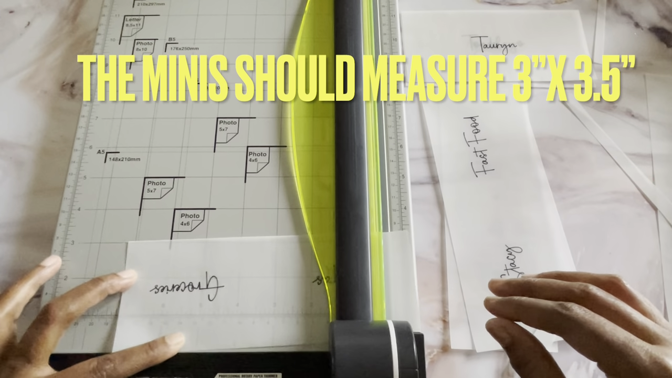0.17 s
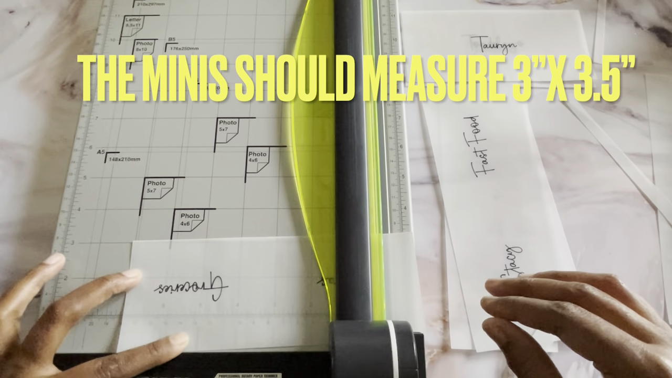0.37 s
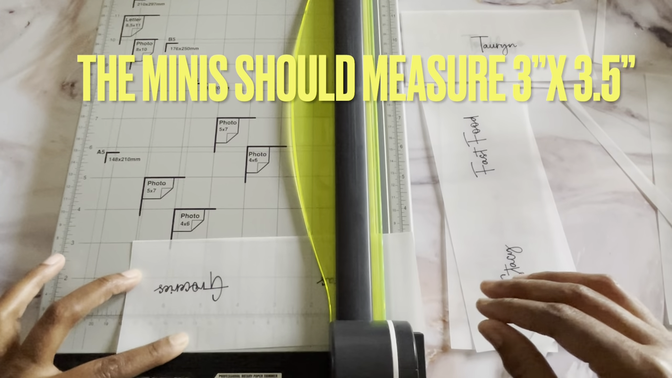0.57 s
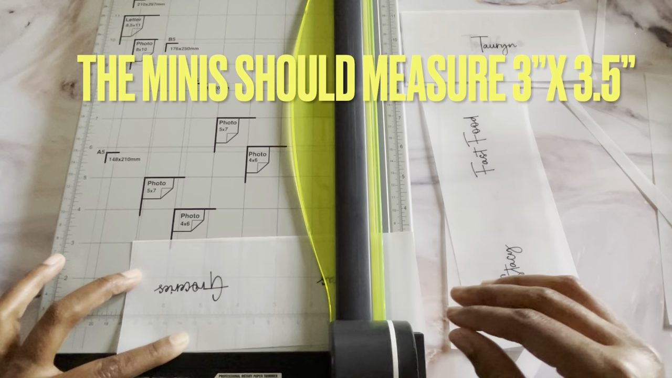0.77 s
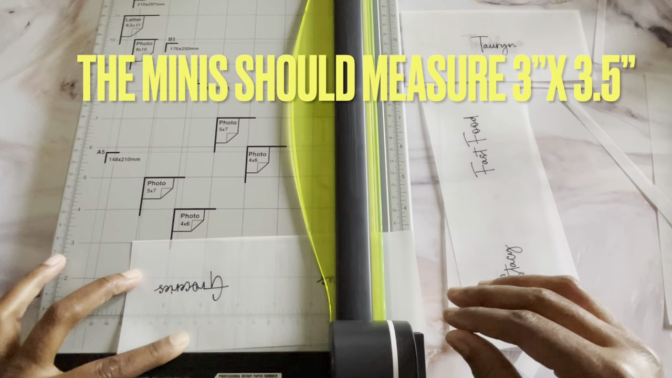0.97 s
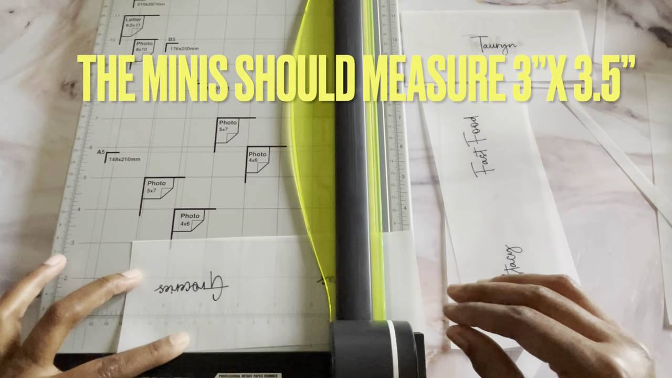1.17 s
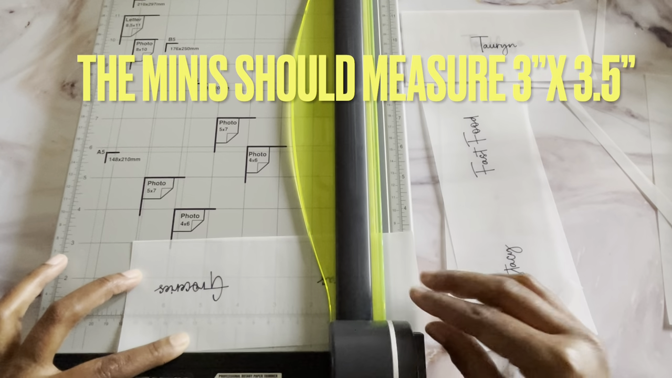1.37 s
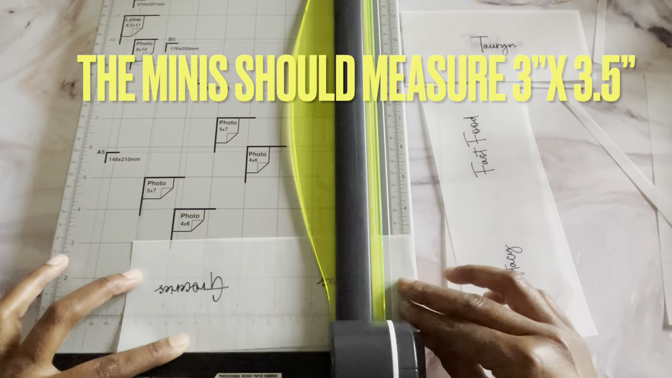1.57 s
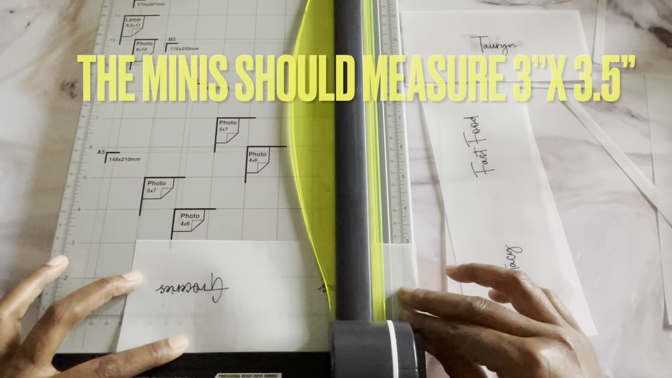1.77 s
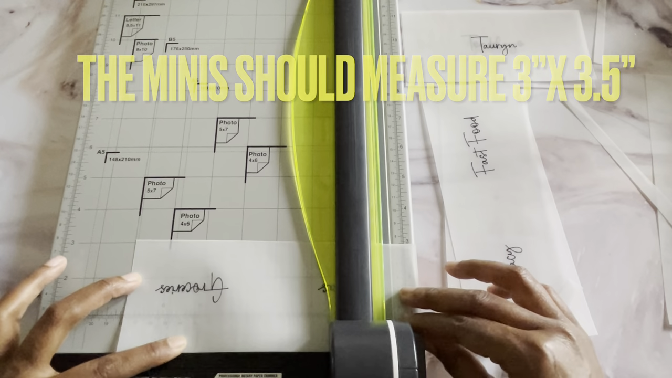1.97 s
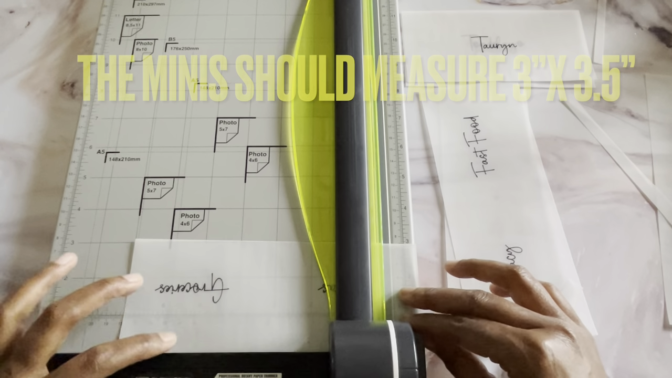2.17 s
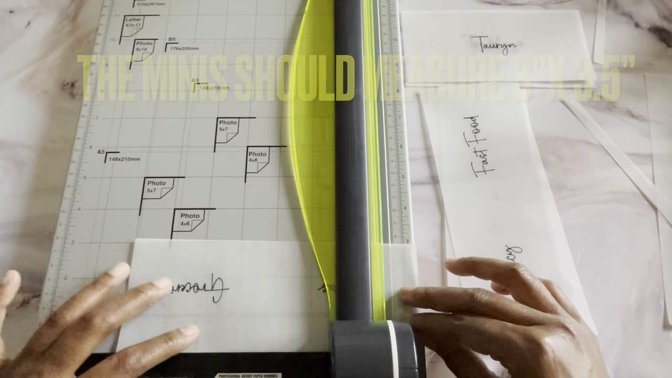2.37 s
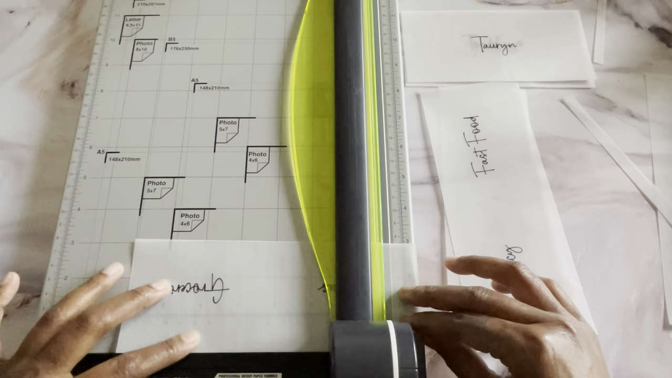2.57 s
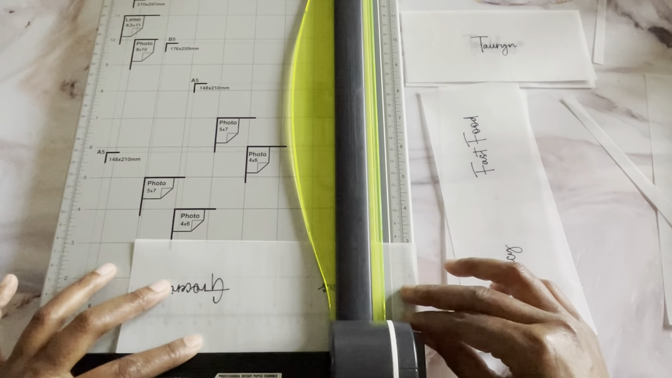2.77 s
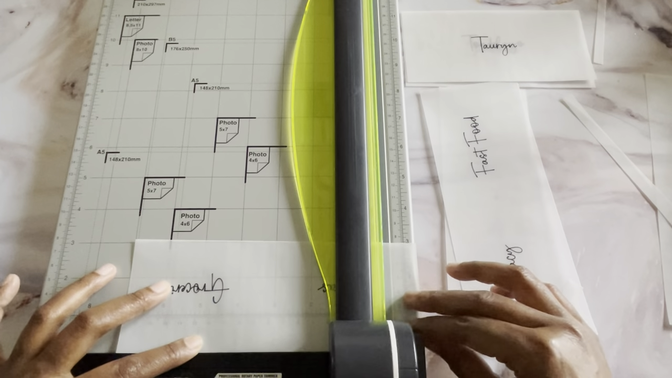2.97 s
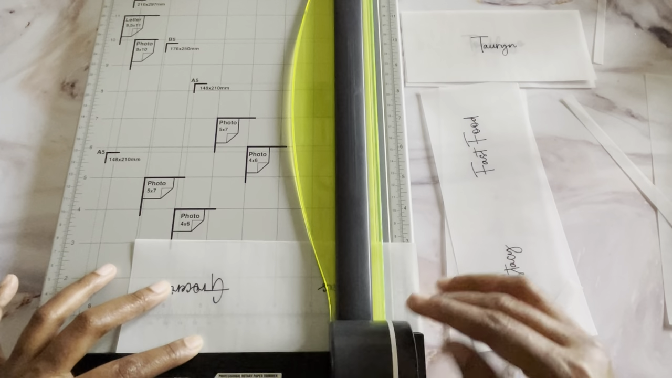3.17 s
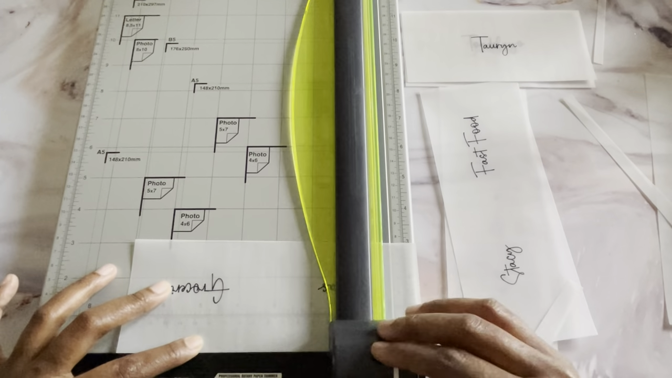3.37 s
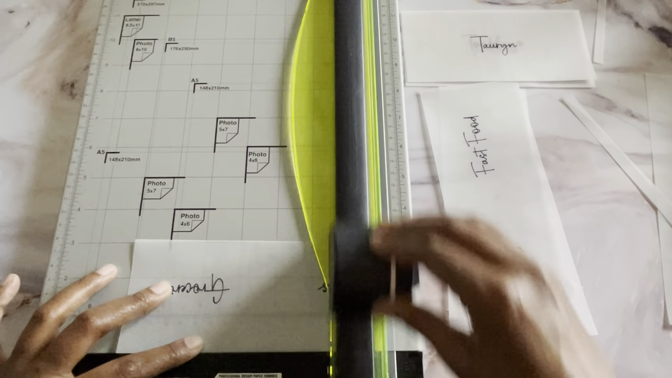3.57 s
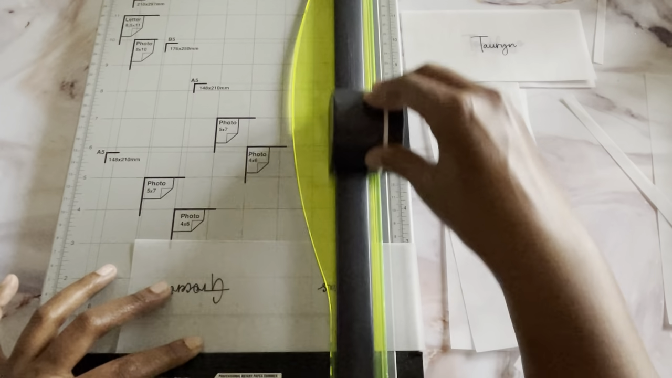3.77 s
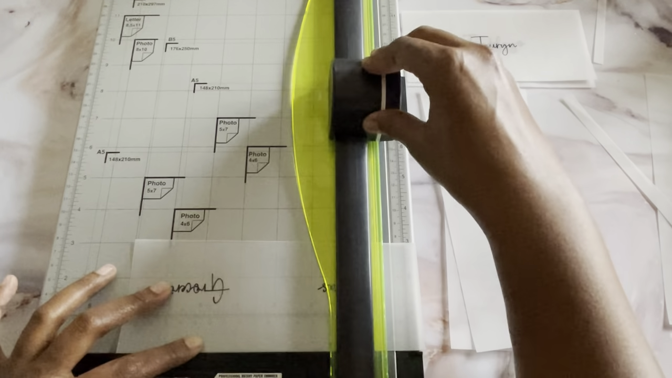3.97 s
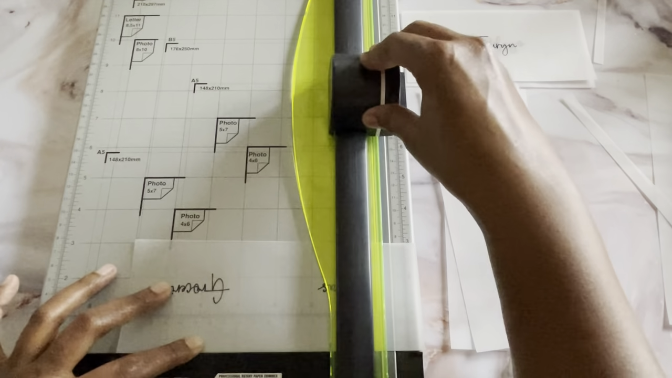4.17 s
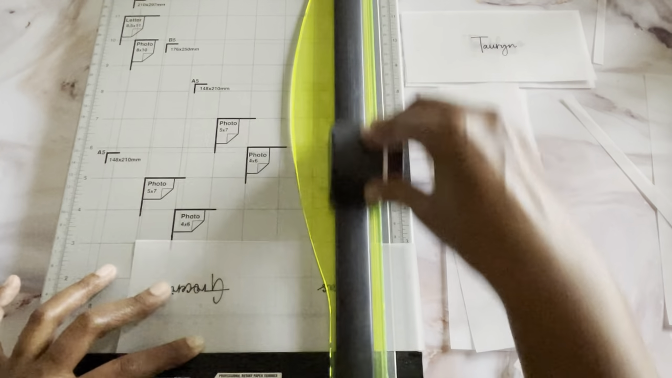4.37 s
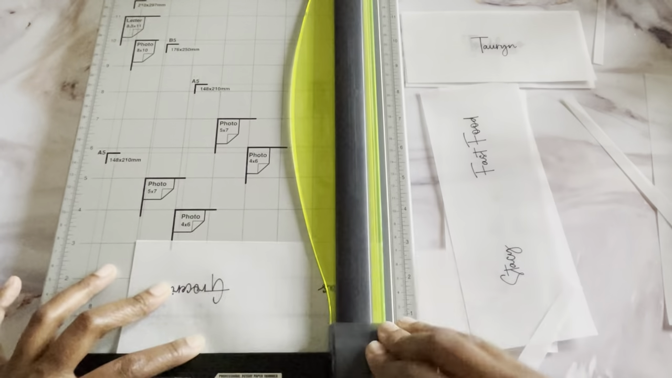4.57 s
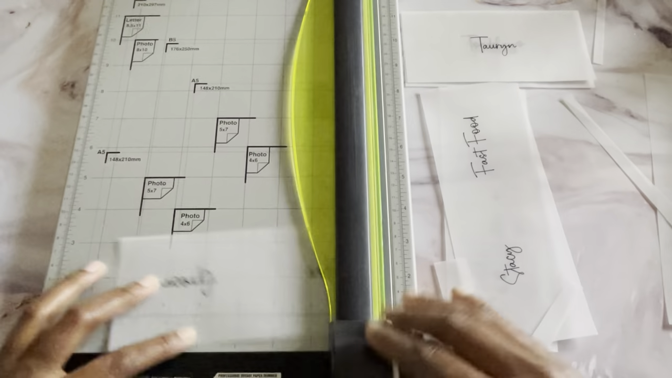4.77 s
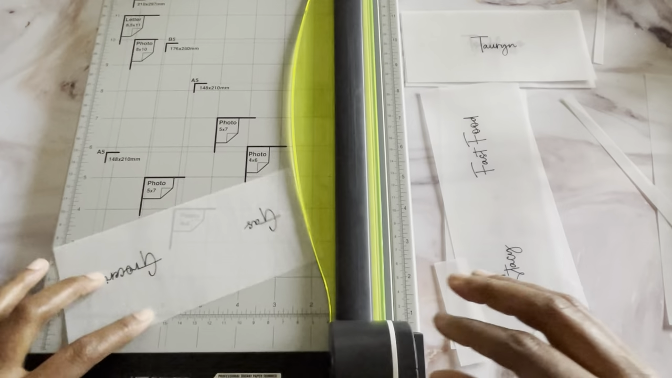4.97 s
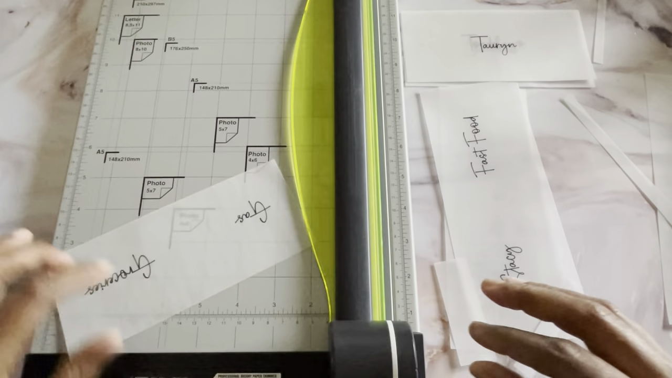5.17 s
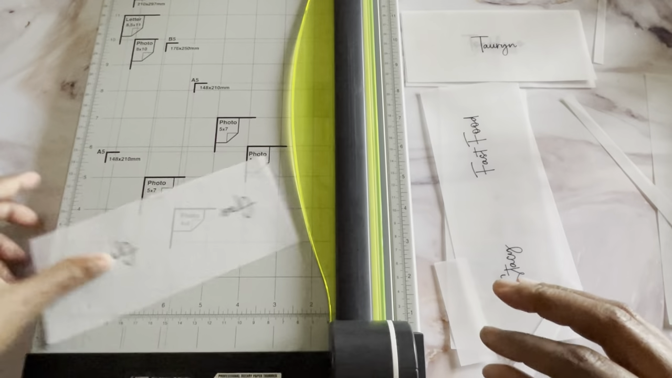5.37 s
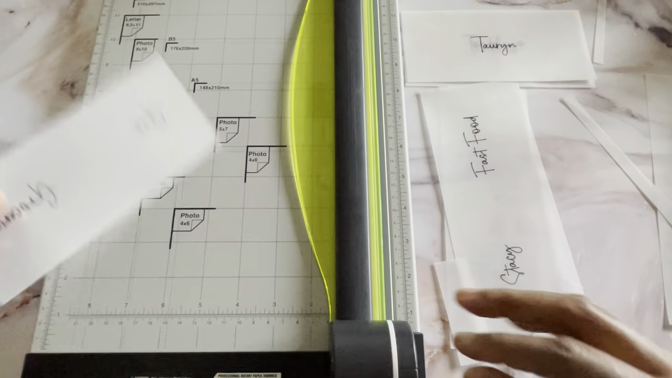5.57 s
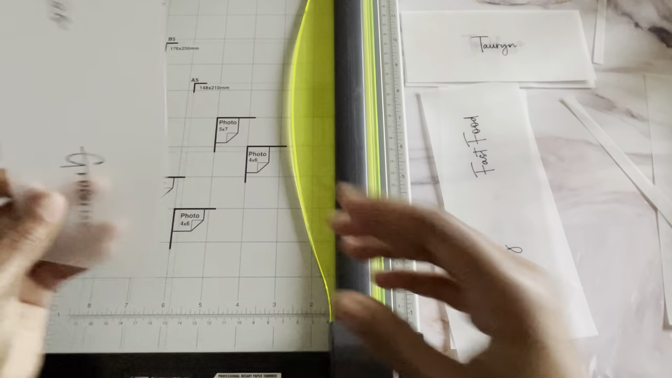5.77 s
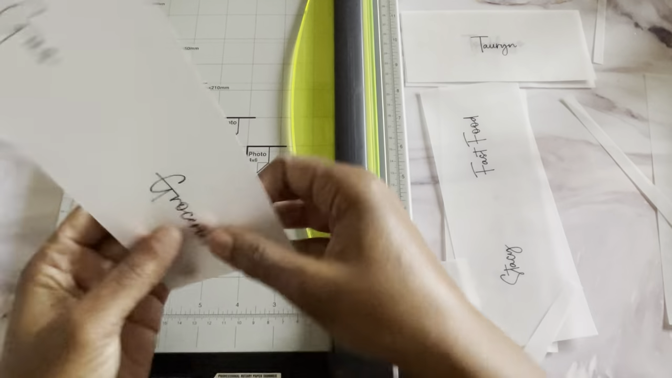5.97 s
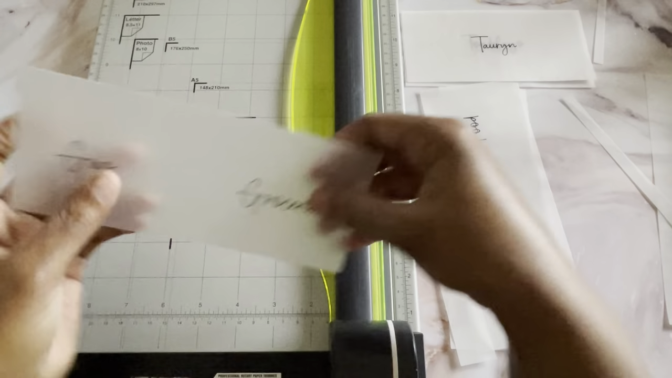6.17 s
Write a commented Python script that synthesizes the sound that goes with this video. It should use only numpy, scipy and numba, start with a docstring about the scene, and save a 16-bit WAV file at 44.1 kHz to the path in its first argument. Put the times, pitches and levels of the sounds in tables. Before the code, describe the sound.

Nearly silent at first: soft rumble, a few tiny finger rubs and creaks. A plastic carriage clacks and rasps along a rail, stops with a sharp knock, then returns faster with a hissing cut and a heavier hollow thunk, followed by a cluster of knocks as it settles. Paper is then lifted, swishing and crackling ever louder. Close microphones, small dry furnished room.

```python
"""A sliding paper trimmer on a desk in a quiet room: fingers shift the sheet, the blade carriage is pushed up its
rail and pulled back through the paper, knocks at the stops, and the sheet is lifted away.
Friction noise and bursts for knocks and scrapes ring the plastic carriage, hollow base and desk; a thin rail rings on.
Paper is banded hiss with grainy snaps, creaking plastic is narrow-band noise, and a machine hums far off.
Two close microphone ports hear it all, with a short diffuse room tail."""
import sys
import numpy as np
from scipy import signal
from scipy.fft import rfft, irfft
from scipy.io import wavfile
from scipy.ndimage import uniform_filter1d
from numba import njit

SR = 44100
rng = np.random.default_rng(int(sys.argv[2]) if len(sys.argv) > 2 else 0)


def magnitude_from_level(level_db):
    """Linear magnitude for a level in decibels (20 dB per decade)."""
    exponent = np.asarray(level_db, float) / 20
    return 10 ** exponent


def transcribe(signal):
    """Save signal, clipped to [-1, 1], as a 16-bit WAV file at the path in sys.argv[1]."""
    frames = np.atleast_2d(signal).T
    limited = np.clip(frames, -1, 1)
    pcm = np.round(limited * 32767).astype(np.int16)
    wavfile.write(sys.argv[1], SR, pcm)


N = 274478
T = np.arange(N) / SR  # s


def shape(x, table):
    """Colour by a (f/Hz, level/dB) spectrum, interpolated over log frequency."""
    hz, db = np.transpose(table)
    f = np.maximum(np.fft.rfftfreq(N, 1 / SR), 1)
    gain_db = np.interp(np.log(f), np.log(hz), db)
    return irfft(rfft(x) * magnitude_from_level(gain_db), N)


def unit(x):
    """Scale to rms 1."""
    return x / np.sqrt(np.mean(x ** 2))


def level(x, envelope):
    """Give a burst the energy of its envelope."""
    return x * np.sqrt(np.sum(envelope ** 2) / np.sum(x ** 2))


def ring(x, modes):
    """Sum of decaying modes (f/Hz, level/dB, t60/s), levelled for steady noise."""
    out = 0
    for hz, db, t60 in modes:
        r = np.exp(-np.log(1000) / (t60 * SR))
        w = 2 * np.pi * hz / SR
        mode = signal.lfilter([np.sin(w) * np.sqrt(1 - r)], [1, -2 * r * np.cos(w), r * r], x)
        out = out + magnitude_from_level(db) * mode
    return out


@njit
def sweep(x, hz, k):
    """State-variable band-pass whose centre moves; a larger k is a wider band."""
    y, b, l = np.empty(len(x)), 0., 0.
    for i in range(len(x)):
        g = np.tan(np.pi * hz[i] / SR)
        v = (b + g * (x[i] - l)) / (1 + g * (g + k))
        b, l, y[i] = 2 * v - b, l + 2 * g * v, k * v
    return y


def band(x, hz, k):
    """Steep fixed band, two filters in a row, rms 1."""
    hz = np.full(len(x), 1. * hz)
    return unit(sweep(sweep(x, hz, k), hz, k))


def walk(rate):
    """Random levels held 1 / rate s and slewed twice; spread near 1."""
    k = int(SR / rate)
    steps = np.repeat(rng.standard_normal(N // k + 1), k)
    return 1.26 * uniform_filter1d(uniform_filter1d(steps, k), k)[:N]


def grit(spread_db, patchy_db, rate):
    """Dense contacts of uneven size whose strength comes in patches."""
    size = np.minimum(rng.exponential(size=N), 5)
    return unit(rng.standard_normal(N) * magnitude_from_level(spread_db * size + patchy_db * walk(rate)))


def play(tables):
    """Soft gate that is shut between the tables, then their curves at every sample."""
    s, *columns = np.concatenate(tables).T
    on = sum((T >= t[0][0]) & (T <= t[-1][0]) for t in tables) > 0
    return (uniform_filter1d(1. * on, size=300), *(np.interp(T, s, c) for c in columns))


def burst(s, ms, rise_ms):
    """Start sample and envelope of a short scrape: a rise to the peak, then an exponential fall."""
    length = min(int((8 * ms + rise_ms) * SR / 1000), N - int(s * SR))
    t = 1000 * np.arange(length) / SR  # ms
    return int(s * SR), np.minimum(t / rise_ms, 1) * np.exp(-np.maximum(t - rise_ms, 0) / ms)


def room_tone():
    """Distant rumble, alike left and right in the bass, with wavering motor lines."""
    # spectrum of the rumble before it is scaled to rumble_db: f/Hz, relative density/dB
    rumble_colour = [(25, -28), (55, 3.5), (80, -2), (200, -11.5), (380, -19), (700, -32.5), (1060, -42),
                     (2000, -49.5), (4500, -53.5), (8000, -64.5), (13000, -61.5), (15000, -82)]
    # width of the rumble: f/Hz, side minus mid/dB
    side_colour = [(60, -27), (200, -11), (380, -2.5), (700, 5), (4000, 1.5)]
    # motor lines, about which pitch and level waver: f/Hz, level/dB
    hum = [(59.2, -57), (96.9, -63), (118.4, -60), (145.3, -64), (193.8, -60.5), (242.2, -72), (296.1, -71),
           (382.2, -79.5)]
    rumble_db = -55.5
    mid = magnitude_from_level(rumble_db) * unit(shape(rng.standard_normal(N), rumble_colour))
    side = magnitude_from_level(rumble_db) * unit(shape(rng.standard_normal(N), rumble_colour))
    side = shape(side, side_colour)
    for hz, db in hum:
        waver_db = 4 * walk(5)
        phase = 2 * np.pi * np.cumsum(hz + 2.2 * walk(9)) / SR
        mid += magnitude_from_level(db + waver_db) * np.sin(phase)
    return np.array([mid + side, mid - side])


def paper():
    """Sliding fibres hiss in a band over the sheet's dull rustle; buckling snaps are grainy bursts."""
    # short rubs of finger and sheet: t/s, length/s, level/dB, main band f/Hz, fine hiss re level/dB
    rubs = [(0.0, 0.014, -76.5, 4220, 4), (0.102, 0.059, -88, 5400, 6.5), (0.213, 0.077, -88.5, 5500, 3.5),
            (1.533, 0.014, -83.5, 4000, 17), (1.581, 0.15, -89.5, 5200, 21), (1.72, 0.042, -64, 4070, -8),
            (1.805, 0.079, -74, 3830, -12), (1.953, 0.032, -70, 4060, -13), (2.373, 0.032, -87, 5550, -2),
            (2.531, 0.07, -94.5, 5030, 21), (2.832, 0.19, -78, 5500, -10.5), (4.742, 0.14, -75, 5550, 22),
            (4.996, 0.049, -94.5, 5490, 20)]
    # the sheet drawn off the base and passed between the hands: t/s, rub level/dB, fine hiss level/dB
    lift = [
        [(5.308, -70, -56.5), (5.4, -60.5, -47.5), (5.44, -64, -51), (5.46, -50, -49.5), (5.51, -49.5, -51.5),
         (5.58, -56, -54), (5.64, -62, -62), (5.69, -61, -54), (5.74, -64.5, -74), (5.86, -58, -53.5),
         (5.905, -66, -69), (5.93, -51, -50.5), (6.11, -69.5, -67.5), (6.22, -53, -43)],
    ]
    # snaps of the buckling sheet: t/s, level/dB, centre f/Hz, fall/ms, rise/ms
    snaps = [(1.421, -69, 3500, 4.4, 1.7), (1.527, -57.5, 7000, 1.2, 0.92), (1.551, -62, 5000, 1.7, 1),
             (1.586, -64, 9000, 4.4, 1.5), (1.712, -53.5, 8600, 1.9, 1.9), (2.351, -56.5, 5800, 3.2, 3.1),
             (2.379, -70, 8000, 2, 0.92), (2.846, -73, 2470, 19, 2.6), (5.352, -51.5, 970, 4.7, 4.2),
             (5.455, -52.5, 1286, 24, 5.1), (5.57, -46.5, 1460, 5.1, 5.6), (5.576, -40.5, 1250, 7.8, 7.3),
             (5.742, -45.5, 1390, 5.4, 1.2), (5.861, -46.5, 4600, 9.2, 2.7), (5.916, -31, 2000, 4, 9.6),
             (5.931, -41, 1100, 9.6, 5.7), (5.989, -35.5, 2200, 5.9, 3.3), (6, -37.5, 2170, 3.3, 7),
             (6.005, -36, 1410, 2.4, 4.6), (6.015, -40, 1760, 5, 2.3), (6.029, -45, 1860, 3.8, 4.5),
             (6.075, -45.5, 6850, 3.6, 4.6), (6.092, -51, 895, 6, 2.1), (6.110, -52.5, 900, 6, 3.8),
             (6.121, -45, 970, 4.1, 4.2), (6.147, -36.5, 1110, 4.1, 5.1), (6.155, -29, 1180, 3.7, 3.7),
             (6.170, -56, 830, 13, 3.1)]
    # colour of the fine hiss: f/Hz, level/dB
    hiss_colour = [(4000, -11.5), (6500, -3.5), (8500, 4.5), (11000, -5.5), (15500, -4.5), (16500, -38.5)]
    rustle_colour = [(150, 21.0), (400, 13.0), (1000, 1.0), (2500, -1.0), (4000, -30.0)]
    attack_s, release_s = 0.013, 0.022  # of a rub
    flex_db, flex_db_per_s = -64, 15  # the free sheet flexes more and more
    creases_per_s, crease_db = 70, -60  # small random creases while the sheet is in the hands
    settle_db, settle_ms = -18.5, 9.3  # crackle that trails a snap

    on, rub_db, hiss_db = play(lift)
    since = np.clip(T - lift[0][0][0], 0, 1)
    hz = 5400 - 1150 * since  # the rub gets duller as the sheet comes free
    fibres = grit(2.8, 3.2, 45)
    sheet = unit(shape(fibres, rustle_colour))
    fine = unit(shape(grit(2.1, 1.5, 40), hiss_colour))
    sliding = unit(sweep(sweep(fibres, hz, 0.7), hz, 0.7))
    out = on * magnitude_from_level(rub_db) * (sliding + magnitude_from_level(-9.0) * sheet)
    out += on * (magnitude_from_level(flex_db + flex_db_per_s * since) * sheet + magnitude_from_level(hiss_db) * fine)

    for s, length, db, band_hz, hiss_rel_db in rubs:
        i = int(s * SR)
        t = np.arange(int((length + 8 * release_s) * SR)) / SR
        e = np.minimum(t / attack_s, 1) * np.exp(-np.maximum(t - length, 0) / release_s)
        cut = slice(i, i + len(e))
        rub = band(fibres[cut], band_hz, 0.39) + magnitude_from_level(-3.5) * sheet[cut] + magnitude_from_level(hiss_rel_db) * fine[cut]
        out[cut] += magnitude_from_level(db) * e * rub

    crackle = grit(1.7, 4.5, 200)
    ticks = (rng.random(N) < creases_per_s / SR) * magnitude_from_level(crease_db + 2.8 * rng.standard_normal(N))
    creases = signal.fftconvolve(ticks, burst(0, 4.4, 2.2)[1])[:N]
    out += on * creases * band(crackle, 1600, 2.2)

    for s, db, centre_hz, ms, rise_ms in snaps:
        i, e = burst(s, ms, rise_ms)
        x = crackle[i:i + len(e)]
        # the whole sheet flaps a little below the snap
        flap_hz = 0.69 * centre_hz
        flap = band(band(x, flap_hz, 3.1), flap_hz, 3.1)
        snap = e * (band(x, centre_hz, 1.8) + magnitude_from_level(2.5) * flap + magnitude_from_level(-31) * x * e)
        out[i:i + len(e)] += magnitude_from_level(db) * level(snap, e)
        # smaller creases settle after it
        i, e = burst(s, settle_ms, 3 * ms)
        settling = e * band(crackle[i:i + len(e)], 0.8 * centre_hz, 1.7)
        out[i:i + len(e)] += magnitude_from_level(db + settle_db) * level(settling, e)
    return out


def creaks():
    """Short stick-slip rubs that sound one narrow plastic resonance and its overtones."""
    # plastic under a finger: t/s, level/dB, pitch f/Hz, overtone re level/dB, fall/ms
    slips = [(0.036, -62, 2095, 2.5, 2.1), (1.42, -59.5, 1360, -4.5, 6.7), (1.471, -57.5, 1370, -11, 29),
             (1.496, -60.5, 1350, -17, 19), (1.517, -75, 1350, 3, 30), (1.574, -82, 1370, -19, 27),
             (2.063, -63.5, 1230, -13, 3.7), (3.291, -72.5, 1970, -15, 48), (3.291, -69, 2650, -29, 18),
             (4.188, -60, 1040, -22, 9.1), (4.960, -56.5, 1736, -17, 16)]
    out, slip = np.zeros(N), grit(1.9, 2.0, 130)
    for s, db, hz, over_db, ms in slips:
        i, e = burst(s, ms, 3.8)
        x = slip[i:i + len(e)]
        tone = band(x, hz, 0.11) + magnitude_from_level(-13.5) * band(x, 1.49 * hz, 0.11)
        tone += magnitude_from_level(over_db) * band(x, 2.024 * hz, 0.13)
        tone += magnitude_from_level(over_db - 7.0) * band(x, 2.34 * hz, 0.1)
        tone += magnitude_from_level(-17.5) * band(x, 2.2 * hz, 0.95)  # a wide breath around the overtones
        out[i:i + len(e)] += magnitude_from_level(db) * e * tone
    return out


def bending(x, ms_at_500):
    """Bending waves in a plate: the lower the pitch, the later it arrives."""
    f = np.fft.rfftfreq(N, 1 / SR)
    # delay goes as 1 / sqrt(f); the second term takes off the delay of the highest pitch
    turns = ms_at_500 / 1000 * (2 * np.sqrt(500 * f) - f * np.sqrt(500 / f[-1]))
    return irfft(rfft(x) * np.exp(-2j * np.pi * turns), N)


def trimmer():
    """Friction, knocks and scrapes drive carriage, base and blade alike; the freed rail rings on faintly."""
    # carriage sliding on the rail, pushed up, pulled back, eased home:
    # t/s, friction drive level/dB, base rumble drive level/dB
    strokes = [
        [(3.39, -76, -51), (3.44, -64.5, -58.5), (3.49, -57.5, -65.5), (3.6, -52.5, -75), (3.74, -54.5, -67.5),
         (3.845, -62, -78.5)],
        [(4.215, -69, -84.5), (4.29, -58, -56.5), (4.38, -51, -44.5), (4.44, -49, -44.5), (4.49, -39.5, -53.5),
         (4.548, -46, -56.5)],
        [(4.72, -74, -58), (4.76, -49.5, -50.5), (4.82, -51.5, -50.5), (4.93, -86, -52.5), (5.0, -73, -62)],
    ]
    # knocks and short scrapes on the trimmer:
    # t/s, drive level/dB, base thump re drive/dB, contact/ms, hardness as band centre f/Hz
    contacts = [(3.327, -45.5, -13.5, 16, 3040), (3.336, -35, -25, 7.1, 1600), (3.345, -43, 6, 6.2, 1520),
                (3.353, -29, -12.5, 4.7, 3200), (3.569, -34.5, -26, 3.8, 5460),
                (3.605, -41, -44, 8.3, 2640), (3.844, -24, -25.5, 6.7, 3530),
                (3.859, -51.5, 10.5, 11, 1130), (4.078, -64.5, -4.5, 16, 2470),
                (4.095, -53.5, -2, 10, 1440), (4.235, -38.5, 0.5, 3.65, 1590), (4.353, -43, -26, 1.9, 2960),
                (4.372, -52.5, 6, 8, 1200), (4.392, -59, 3, 6.3, 1200), (4.436, -36.5, -12.5, 2.5, 2600),
                (4.449, -48, -5.5, 6.2, 3200), (4.474, -40.5, -12.5, 2.4, 3200),
                (4.536, -29, -14, 5.6, 2220), (4.550, -18.5, -11, 3.6, 1750),
                (4.569, -28.5, -10.5, 6.4, 3080), (4.633, -49, 0.5, 1.35, 4000),
                (4.696, -32, -16.5, 4.6, 2170), (4.7104, -21, -14.5, 4.04, 1160),
                (4.768, -21.5, -11, 7.7, 2570), (4.809, -31, -5.5, 11.4, 2700),
                (4.878, -42.5, -7.5, 8.2, 2500), (4.909, -42.5, -3.5, 8.1, 1570)]
    # resonances of hollow base, plastic carriage, thin metal rail and desk top: f/Hz, relative level/dB, t60/s
    base_modes, carriage_modes = [(252.5, -9, 0.099), (343, -6, 0.18), (383.4, 0, 0.09), (481, -2.5, 0.056),
                                  (590, -11.5, 0.023), (742, -4, 0.075)], [(1120, 1, .045), (1320, 1, .04), (1700, -10, .02),
                                                (2650, -4, .025), (3150, -2, .02), (4150, -11, .015),
                                                (5600, -10, .012)]
    rail_modes, desk_modes = [(2309, 0, 1.8), (2799, -3, .65), (3262, -9, 1.2), (3321, 2, .7),
                              (4040, 1.5, 1.4)], [(122, -11.5, 0.15), (146.9, 1, 0.26), (163, -13, 0.096),
                                            (181.3, -5.5, 0.26), (210, -12, 0.17)]
    # colour of the blade's hiss, and of the carriage's rumble as it reaches the base: f/Hz, relative level/dB
    blade_colour, rumble_colour = [(3000, -4), (4300, -7), (5600, -2.3), (7500, -2), (10000, -6),
                                   (13000, -12.5), (15500, -8), (16500, -42)], [(90, 1.5), (230, 7.5), (400, 0.5), (650, -10.5)]
    direct = [(350, 4.5), (750, 0.0), (1400, -6.5), (4000, -9.5), (6000, -16.5), (9000, -38.0)]
    thud = [(70, -37.0), (140, -20.0), (400, 14.0), (900, 12.5), (2000, -19.0)]
    cut_s, cut_end_s, cut_db, cut_fade_db_per_s = 4.434, 4.548, -40.5, 60.5  # the blade parting the sheet
    rattle_db, rattle_ms, boom_db, boom_ms = -18.5, 68, -15, 13  # loose parts and base shake on after a contact
    treble_db, treble_db_per_doubling = -5, -13  # treble of a 4 ms contact; longer contact is duller
    release_s = 4.75  # the hand has left the carriage and no longer damps the rail
    grip_wander_s, desk_lag_s = 0.003, 0.02074  # the desk top swings in a moment after the base

    on, rub_db, base_db = play(strokes)
    grains = grit(3.1, 6.7, 60)
    edge = unit(shape(grit(2.1, 2.1, 90), blade_colour))
    cutting = uniform_filter1d(1. * ((T > cut_s) & (T < cut_end_s)), size=300)
    cutting = cutting * magnitude_from_level(cut_db - cut_fade_db_per_s * np.clip(T - cut_s, 0, 1))
    shell = on * magnitude_from_level(rub_db) * grains
    low = on * magnitude_from_level(base_db) * unit(shape(grit(1.5, 3, 45), rumble_colour))
    # the blade hisses along its groove in step with the friction, 1 dB over it
    blade = (on * magnitude_from_level(rub_db + 1) + cutting) * edge

    hits, jolt = np.zeros(N), np.zeros(N)
    push = np.hanning(int(0.0017 * SR))
    for s, db, base_rel_db, ms, hz in contacts:
        i, e = burst(s, ms, 0.45 * ms)  # builds up over this share of its contact
        grain = grains[i:i + len(e)]
        hits[i:i + len(e)] += magnitude_from_level(db) * level(e * band(grain, hz, 1.8), e)
        # the base takes the chatter and one soft push
        low[i:i + len(e)] += magnitude_from_level(db + base_rel_db + 2.4) * level(e * grain, e)
        low[i:i + len(push)] += magnitude_from_level(db + base_rel_db + 6) * push
        # the treble of a contact falls away faster than its body
        high_db = db + treble_db + treble_db_per_doubling * np.log2(ms / 4)
        blade[i:i + len(e)] += magnitude_from_level(high_db) * e ** 1.55 * edge[i:i + len(e)]
        afters = ((hits, rattle_db, rattle_ms), (low, base_rel_db + boom_db, boom_ms))
        for part, after_db, after_ms in afters:
            i, e = burst(s, after_ms, ms)
            part[i:i + len(e)] += magnitude_from_level(db + after_db) * e * grains[i:i + len(e)]
        jolt[i] = magnitude_from_level(db) * (s > release_s)

    # friction mostly sings in the carriage's resonances, a short contact is mostly its broad crack
    sing = ring(magnitude_from_level(-5.5) * shape(shell, [(550, -24.0), (1050, 3.5)]), carriage_modes)
    # a wandering delay bends those resonances by a few percent as the grip shifts
    sing = np.interp(T + grip_wander_s * walk(7), T, sing)
    # each path is scaled by its response to the steady grain noise
    body = (sing + ring(magnitude_from_level(-27) * hits, carriage_modes)) / np.std(ring(grains, carriage_modes))
    body += shape(magnitude_from_level(-41.0) * shell + magnitude_from_level(-8.5) * hits, direct) / np.std(shape(grains, direct))
    late = np.roll(uniform_filter1d(low, size=60), int(desk_lag_s * SR))
    base = magnitude_from_level(-3.0) * ring(late, desk_modes) / np.std(ring(grains, desk_modes))
    base += magnitude_from_level(-2.0) * ring(low, base_modes) / np.std(ring(grains, base_modes))
    base += magnitude_from_level(-1.5) * shape(low, thud) / np.std(shape(grains, thud))
    plate = bending(body + shape(base, [(60, -13.5), (130, -6.0)]), 5.3)
    return plate + blade + magnitude_from_level(-7) * ring(jolt, rail_modes)


def ports(x, pan_db):
    """A near source reaches the two microphone ports with a phase and level gap that depends on pitch."""
    # f/Hz, phase by which left leads/rad
    lead = [(0, 0), (1800, .1), (3800, .8), (4700, -.3), (5200, 0), (7300, 3.0), (8200, 3.3), (10600, 6.2),
            (11600, 6.4), (13700, 9.3), (15000, 9.5), (16500, 11)]
    # f/Hz, left minus right before panning/dB
    tilt = [(600, -0.1), (1200, -3.5), (2000, -0.5), (4200, -5.5), (5200, 2.2)]
    f = np.fft.rfftfreq(N, 1 / SR)
    gap_db = np.interp(f, *np.transpose(tilt)) + pan_db * (f < 5200)
    half = (1j * np.interp(f, *np.transpose(lead)) + np.log(magnitude_from_level(gap_db))) / 2
    return irfft(rfft(x) * np.exp([half, -half]), N)


def reflections(x, t60, db):
    """Diffuse tail of a small furnished room, its own for each side, dull on top."""
    t = np.arange(int(t60 * SR)) / SR
    tail = rng.standard_normal((2, len(t))) * 1000 ** (-t / t60) * np.minimum(t / 0.0055, 1)
    tail /= np.sqrt(np.sum(tail ** 2, axis=1, keepdims=True))
    wet = signal.fftconvolve(x[None], tail, axes=1)[:, :N]
    return magnitude_from_level(db) * shape(wet, [(200, -14.0), (600, 2.5), (3000, 0.5), (5500, -7.0)])


def scene():
    """Near sounds through the ports, plus reflections and room tone."""
    tool, sheet = trimmer() + creaks(), paper()
    near = ports(tool, 0) + ports(sheet, -0.5)  # the sheet is nearer the right port
    return near + reflections(tool + sheet, 0.24, -7.0) + room_tone()


def top_cut(x):
    """Nothing passes above the cut-off."""
    return signal.sosfilt(signal.butter(12, 17150, fs=SR, output="sos"), x)


def record(dry):
    """The finished mix as it is stored."""
    return top_cut(dry)


dry = scene()
out = record(dry)
transcribe(out)
```